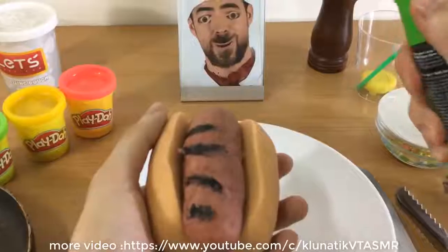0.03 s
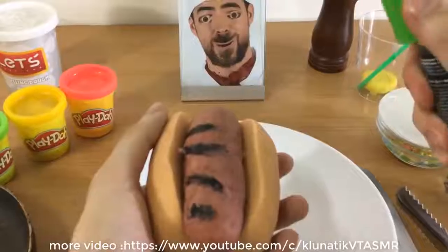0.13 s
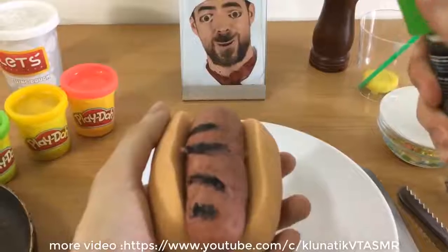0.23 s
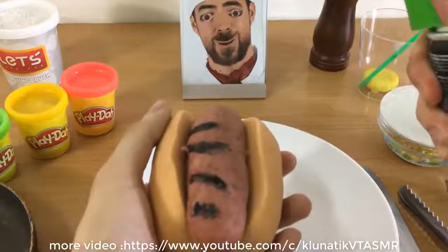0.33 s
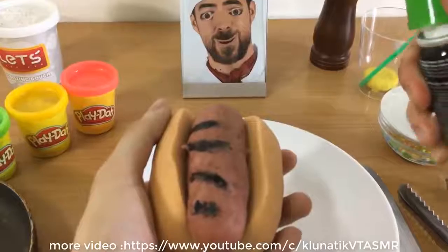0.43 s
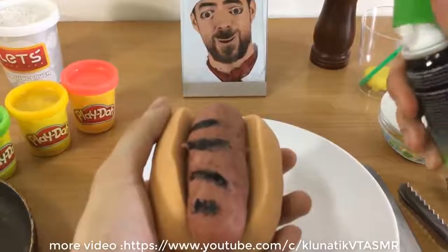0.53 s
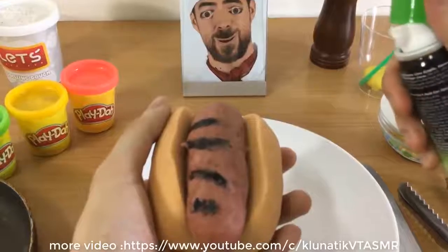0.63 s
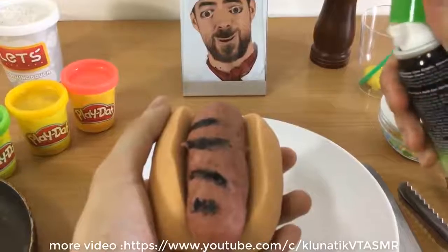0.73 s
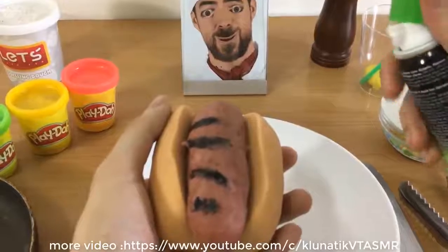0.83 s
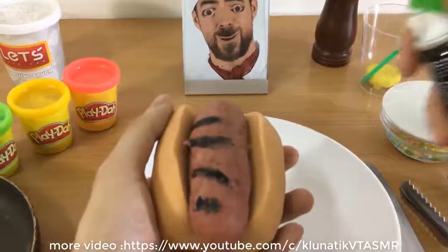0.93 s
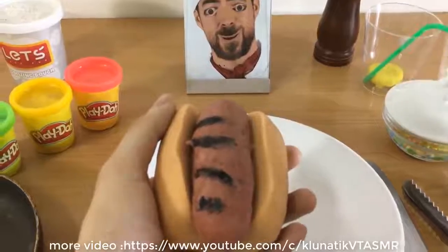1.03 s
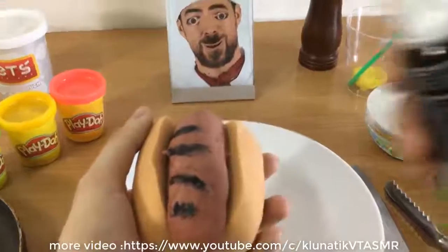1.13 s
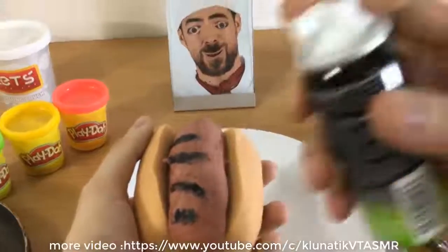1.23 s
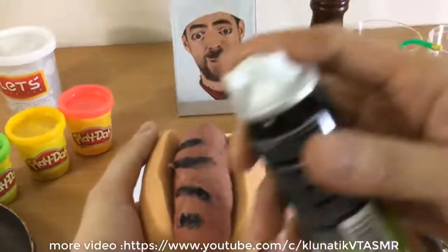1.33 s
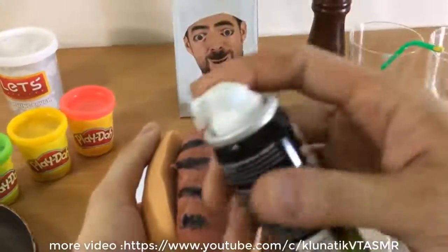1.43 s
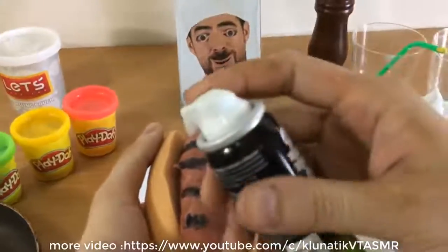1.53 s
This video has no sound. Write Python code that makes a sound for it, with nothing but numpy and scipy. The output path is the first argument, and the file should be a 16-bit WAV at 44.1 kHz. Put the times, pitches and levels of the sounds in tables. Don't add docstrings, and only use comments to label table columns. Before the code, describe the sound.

A plastic cap pops off a spray can: faint skin rubbing, a small click, then a loud hollow snap ringing in a hard room, followed by faint ticks and scuffs, very close stereo microphones, low rumble.

```python
import sys
import numpy as np
from scipy import signal
from scipy.fft import rfft, irfft, next_fast_len
from scipy.io import wavfile
from scipy.ndimage import map_coordinates

SR = 44100
rng = np.random.default_rng(int(sys.argv[2]) if len(sys.argv) > 2 else 0)


def wav_record(signal):
    frames = np.transpose(np.atleast_2d(signal))
    bounded = np.clip(frames, -1, 1)
    quanta = np.round(bounded * 32767).astype(np.int16)
    wavfile.write(sys.argv[1], SR, quanta)


def voltage_ratio(decibels):
    exponent = np.asarray(decibels, float) / 20
    return 10 ** exponent


N = 70560

# f/Hz, level/dB
RUMBLE_TONE = [(15, -37.5), (25, -1.5), (49, 2), (97, -3.5), (124, -2.5), (262, -6.5), (670, -14.5),
               (738, -16), (1200, -19.5), (1560, -54), (2640, -120)]
# f/Hz, width/Hz, level/dB
STANDING_WAVES = [(47.4, 11.5, 4), (100.7, 14.5, 1), (158.5, 15, 0), (201, 9, 6), (259, 18, -2)]
# f/Hz, level/dB
HISS_TONE = [(800, -23.5), (1200, -6), (1700, -11.5), (2300, -17), (5000, -25), (11000, -27),
             (12000, -29.5), (12700, -44), (16000, -58)]
# f/Hz, likeness/1
FLOOR_LIKE = [(60, 0.066), (150, 0.4), (380, 0.42), (950, 0.77), (2380, 0.54), (5980, 0.18), (15000, 0.01)]
# f/Hz, left-right level/dB
FLOOR_PAN = [(60, 5), (180, 2.5), (550, -1), (1650, -1.5), (4970, -2.5), (15000, 2.5)]

# f/Hz, t60/s
ROOM_DECAY = [(120, 0.7), (220, 0.73), (400, 0.52), (1000, 0.81), (2000, 0.77), (4000, 0.64), (8000, 0.55),
              (12000, 0.45), (15500, 0.088)]
# f/Hz, width/Hz, level/dB
ROOM_PEAKS = [(213, 25, 3.5), (262, 19.9, -1), (484, 28, 3), (530, 19, 2.5), (1018, 33.8, 4), (1200, 25, 1),
              (5030, 150, -1)]
# f/Hz, likeness/1
ROOM_LIKE = [(60, 0.1), (130, -0.11), (290, 0.99), (430, 0.56), (540, 0.012), (700, 0.71), (2000, 0.63),
             (6800, 0.32), (15000, 0.174)]
# f/Hz, level/dB
EVEN_TONE = [(100, 0), (16000, 0)]

# start t/s, top t/s, level/dB, f/Hz, unsteadiness/dB, t60/s
CAN_RING = (.84, .905, -61, 1705, 4, .7)
# t/s, level/dB, ring f/Hz, t60/s, left-right level/dB
TICKS = [(.062, -51, 5800, .012, -2), (.0622, -57, 10000, .01, -2), (.2125, -51, 6200, .012, -7),
         (.2128, -51, 11000, .012, -6), (.213, -52, 4300, .012, 5), (.824, -54, 2510, 0.05, -3),
         (.843, -55, 2550, .04, -3), (.875, -55, 4870, 0.027, -5), (.876, -48, 2700, 0.02, -10),
         (.886, -53, 2550, .05, -8), (.889, -51, 1710, 0.068, 2), (.9035, -45, 1700, 0.037, -9),
         (.9045, -44, 2360, 0.028, -8), (1.144, -50, 5650, 0.016, -10), (1.145, -50, 3750, 0.025, -10),
         (1.1455, -48, 2330, 0.03, -8), (1.157, -60, 4300, .03, -8), (1.16, -45, 215, 0.054, -1),
         (1.165, -59, 3800, .02, -8), (1.1705, -56, 4600, .01, -8), (1.287, -59, 2230, 0.05, -5)]
# start t/s, length/s, level/dB, end flick level/dB
SCUFFS = [
    (0.816, 0.077, -68, -90),
    (0.871, 0.037, -59, -56),
    (1.145, 0.0273, -60.5, -67),
    (1.282, 0.014, -69, -85),
]
# f/Hz, level/dB
SCUFF_TONE = [(200, -25.5), (500, -0.5), (2000, 0.5), (4500, -13), (8000, -14), (11500, -14), (12800, -19),
              (15000, -40)]
SCRAPE_HZ = [2570, 2333, 4430, 2196]

# t/s, pressure level/dB
RUB = [
    (0., -62.5),
    (0.058, -64.5),
    (0.096, -61),
    (0.121, -59.5),
    (0.135, -60),
    (.155, -62),
    (.2, -63),
    (.3, -64),
    (0.381, -68),
]
# f/Hz, level/dB
SKIN_TONE = [(1800, -10), (2600, 3.5), (3300, 5.5), (4200, -2), (6000, -5), (8000, -8.5), (13000, -7),
             (14500, -21)]
# f/Hz, width/Hz, level/dB
SQUEAK = [(4220, 220, 8), (5950, 560, -5.5), (7660, 1200, 0.5)]

# t/s, level/dB, rise/s, t60/s
PRICK = (.2135, -51, .0012, .02)
# f/Hz, level/dB
PRICK_TONE = [(2000, -28), (3500, -10), (6000, 2), (8500, -2.5), (11000, 2), (14000, -16), (16500, -29)]
# t/s, level/dB, f/Hz, t60/s, left-right level/dB
THUD = (.395, -29, 100, .08, 6)
# f/Hz, level/dB, t60/s
REBOUND = [(1003, -15.5, 0.029), (2950, -17.5, 0.02), (5130, -34, .012)]

# blow t/s, hollow level/dB, crack level/dB, room level/dB, left later than right/s, left-right level/dB
SNAPS = [
    (.2421, -16, -31, -39, 0., -0.5),
    (.3918, -4.5, -11.5, -21.5, 0.00021, -3.),
]
SNAP_ALIKE = [1, 0.52]
# f/Hz, level/dB, t60/s
RIM_MODES = [(447, 4, 0.016), (720, -1, 0.0125), (1000, -0.5, 0.012), (1475, -4, 0.0067),
             (1728, 4.5, 0.0057), (4490, -9.5, 0.01), (5770, -7.5, 0.011), (7600, -4, 0.0067),
             (8800, -19, 0.0067)]
# f/Hz, level/dB, t60/s, left-right level/dB
CAP_MODES = [(464, 5, 0.016, -11.5), (320, 2.5, .01, 14.5), (678, 3.5, 0.0096, 11), (774, -3, 0.012, 0),
             (990, -6, 0.011, -4.5), (1280, -2.5, 0.016, -8.5), (1560, -5.5, 0.01, 8.5),
             (2140, -6, .01, -2.5), (2960, -13.5, 0.022, 0), (4510, -7, 0.016, 5.5),
             (6240, -9.5, 0.012, -2), (6600, -14, 0.0081, 1), (7615, -10.5, 0.011, 16)]
FACING = [1, -0.9]
SLIP_S = [0.0016, 0.0025]
CREEP_S = [0.002004, 0.002]
CRACK_T60 = [0.023, 0.017]
CRACK_LATE_S = [.0005, .001]
# f/Hz, level/dB
CRACK_TONE = [
    [(200, -27.5), (900, -13), (1700, -1), (2900, -16), (4700, -8), (5800, -5.5), (8500, -5.5),
     (15500, -12.5), (17000, -60)],
    [(200, -28), (900, -7), (2000, -1.5), (3000, 2), (4200, -5.5), (6500, -3), (9000, -10.5), (14500, -13),
     (17000, -48.5)],
]
TABLE_S = [.0018, .0036, .0052, .011, .021]
TABLE_DB = [-16.5, -26.5, -13.5, -24.5, -23.5]
# f/Hz, level/dB
ROOM_TONE = [
    [(60, -34), (150, -10), (280, 4.5), (500, -3), (1000, -9.5), (2500, -12), (6000, -22.5), (14000, -32)],
    [(60, -38), (130, -5.5), (260, 1.5), (450, 0.5), (1000, -8.5), (2700, -13.5), (5500, -17.5),
     (9000, -25), (15000, -23)],
]


def unit(x):
    return x / np.sqrt(np.mean(x ** 2) + 1e-20)


def along(points, hz):
    f, value = np.transpose(points)
    return np.interp(np.log(hz + 1), np.log(f + 1), value)


def filtered(x, response):
    m = next_fast_len(x.shape[-1] + 8192)
    spectrum = rfft(x, m) * response(np.fft.rfftfreq(m, 1 / SR))
    return irfft(spectrum, m)[..., :x.shape[-1]]


def wobble(rate):
    return map_coordinates(rng.standard_normal(N // 8), [np.arange(N) * rate / SR])


def rush(tone, alike):
    def mid_side(hz):
        turn = np.arccos(np.clip(alike(hz), -1, 1)) / 2
        return voltage_ratio(along(tone, hz)) * [np.cos(turn), np.sin(turn)]

    mid, side = filtered(rng.standard_normal((2, N)), mid_side)
    return unit(np.array([mid + side, mid - side]))


def sides(db):
    return voltage_ratio([[db / 2], [-db / 2]])


def ring(t, hz, t60):
    after = np.maximum(t, 0)
    return np.sin(2 * np.pi * hz * after) * voltage_ratio(-60 * after / t60)


def band(f, hz, width_hz):
    return 1j * f * width_hz / (hz * hz - f * f + 1j * f * width_hz)


def peaked(f, modes):
    return 1 + sum(voltage_ratio(db) * band(f, hz, width) for hz, width, db in modes)


def floor():
    like = lambda hz: along(FLOOR_LIKE, hz)
    rumble = unit(filtered(rush(RUMBLE_TONE, like), lambda f: peaked(f, STANDING_WAVES)))
    lumps_db = 0.8 * np.array([wobble(7.08), wobble(43)])
    both = voltage_ratio(-45.5 + lumps_db) * rumble + voltage_ratio(-63) * rush(HISS_TONE, like)
    return filtered(both, lambda hz: voltage_ratio(np.outer([.5, -.5], along(FLOOR_PAN, hz))))


def tail(tone, alike):
    delay_s, build_s = 0.0087, 0.0019
    late_db, late_longer = -20.5, 2.37
    steady = filtered(rush(tone, alike), lambda f: peaked(f, ROOM_PEAKS))
    hz, t, z = signal.stft(steady, SR, nperseg=256)
    fall_db = -60 * t / along(ROOM_DECAY, hz)[:, None]
    fall = np.hypot(voltage_ratio(fall_db), voltage_ratio(late_db + fall_db / late_longer))
    x = signal.istft(z * fall, SR, nperseg=256)[1][:, :N]
    return x * (1 - np.exp(-np.maximum(np.arange(N) / SR - delay_s, 0) / build_s))


def can():
    start, top, db, hz, waver_db, t60 = CAN_RING
    t = np.arange(N) / SR
    rise = np.clip((t - start) / (top - start), 0, 1)
    swell = rise * voltage_ratio(db - 60 * np.maximum(t - top, 0) / t60)
    waver = voltage_ratio(waver_db * wobble(40))
    tone = np.sin(2 * np.pi * hz * t + .5 * wobble(30))
    return swell * waver * tone * np.ones((2, 1))


def tick(t, db, hz, t60, pan_db, noise):
    crack = voltage_ratio(-17 - 60 * np.maximum(t, 0) / 0.016) * (t > 0) * noise
    rough_ring = ring(t, hz, t60) * voltage_ratio(2.0 * wobble(500)) * np.clip(t / 0.0009, 0, 1)
    return voltage_ratio(db) * (rough_ring + crack) * sides(pan_db)


def scuff(t, length, db, flick_db, hz, noise):
    hold = np.clip(t / 0.0014, 0, 1) * voltage_ratio(-60 * np.maximum(t - length, 0) / 0.038)
    flick = voltage_ratio(flick_db) * np.exp(-((t - length) / 0.0018) ** 2)
    scrape = voltage_ratio(-8) * unit(filtered(noise, lambda f: band(f, hz, 410)))
    grit_db = 1.8 * wobble(330)
    return voltage_ratio(db + grit_db) * hold * (noise + scrape) + flick * noise


def handling():
    t = np.arange(N) / SR
    noise = rush(SCUFF_TONE, lambda hz: 0.27 + 0 * hz)
    out = sum(tick(t - s, *settings, noise) for s, *settings in TICKS)
    for (s, length, db, flick_db), hz in zip(SCUFFS, SCRAPE_HZ):
        out = out + scuff(t - s, length, db, flick_db, hz, noise)
    walls = tail(EVEN_TONE, lambda hz: along(ROOM_LIKE, hz))
    walls = walls / np.linalg.norm(walls[0])
    return out + voltage_ratio(-10.0) * signal.fftconvolve(out.mean(0)[None], walls, axes=1)[:, :N]


def rub():
    db = np.interp(np.arange(N) / SR, *np.transpose(RUB), right=-120)
    bands = lambda f: sum(voltage_ratio(level) * band(f, hz, width) for hz, width, level in SQUEAK)
    squeak = unit(filtered(rng.standard_normal((2, N)), bands))
    squeak = squeak * voltage_ratio(4.9 * (db - db.max()) + 7.5)
    grain_db = 2.6 * wobble(150)
    hiss = rush(SKIN_TONE, lambda hz: along(FLOOR_LIKE, hz))
    return voltage_ratio(db + grain_db) * (hiss + squeak) * sides(-2.5)


def prick():
    s, db, rise, t60 = PRICK
    t = np.arange(N) / SR - s
    shape = np.where(t < 0, np.exp(-(t / rise) ** 2), voltage_ratio(-60 * np.maximum(t, 0) / t60))
    return voltage_ratio(db) * shape * rush(PRICK_TONE, lambda hz: .8 + 0 * hz)


def jolts():
    t = np.arange(N) / SR
    knock = sum(voltage_ratio(db) * ring(t - .3945, hz, t60) for hz, db, t60 in REBOUND)
    s, db, hz, t60, pan_db = THUD
    return knock + voltage_ratio(db) * ring(t - s, hz, t60) * sides(pan_db)


def crack(k, t, db, alike):
    u = t - CRACK_LATE_S[k]
    creep = np.exp(np.minimum(u, 0) / CREEP_S[k]) * (t > -SLIP_S[k])
    shape = np.where(u < 0, creep, voltage_ratio(-60 * np.maximum(u, 0) / CRACK_T60[k]))
    roughness_db = 3.5 * wobble(1500)
    return voltage_ratio(db + roughness_db) * shape * rush(CRACK_TONE[k], alike)


def hollow(modes, t):
    out = sum(voltage_ratio(db) * ring(t, hz, t60) * sides(sum(aim)) for hz, db, t60, *aim in modes)
    return out * (1 - np.exp(-np.maximum(t, 0) / 0.00049))


def near_field(hz):
    echoes = sum(voltage_ratio(db) * np.exp(-2j * np.pi * hz * delay) for delay, db in zip(TABLE_S, TABLE_DB))
    return (1 + echoes) * (1j * hz / (218 + 1j * hz)) ** 2


def snaps():
    out = 0
    for k, (s, hollow_db, crack_db, room_db, lag, pan_db) in enumerate(SNAPS):
        t = np.arange(N) / SR - s - np.array([[lag], [0]])
        same = lambda hz: SNAP_ALIKE[k] + 0 * hz
        body = voltage_ratio(hollow_db) * hollow((RIM_MODES, CAP_MODES)[k], t) * [[FACING[k]], [1]]
        blow = (body + crack(k, t, crack_db, same)) * sides(pan_db)
        walls = tail(ROOM_TONE[k], (same, lambda hz: along(ROOM_LIKE, hz))[k])
        walls = np.pad(walls, ((0, 0), (round(s * SR), 0)))[:, :N]
        out = out + filtered(blow, near_field) + voltage_ratio(room_db) * walls * sides(pan_db / 2)
    return out


def scene():
    return snaps() + rub() + handling() + floor() + can() + prick() + jolts()


def band_limit(x):
    return signal.sosfilt(signal.butter(12, 16550, fs=SR, output="sos"), x)


def record(dry):
    top, hardness = 0.8, 5
    loud = dry / (1 + np.abs(dry / top) ** hardness) ** (1 / hardness)
    mix = filtered(loud, lambda hz: hz < 16550)
    return band_limit(mix)


dry = scene()
out = record(dry)
wav_record(out)
```